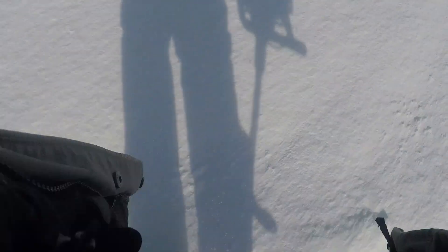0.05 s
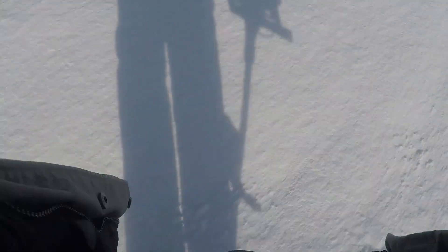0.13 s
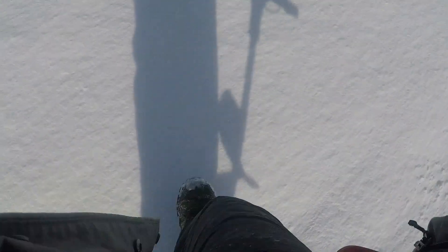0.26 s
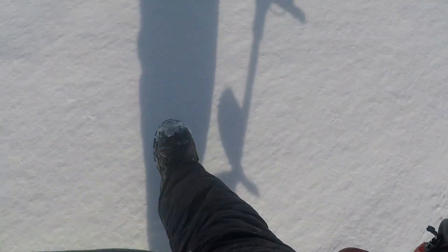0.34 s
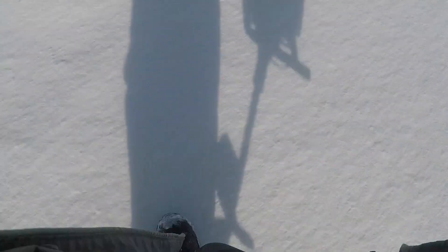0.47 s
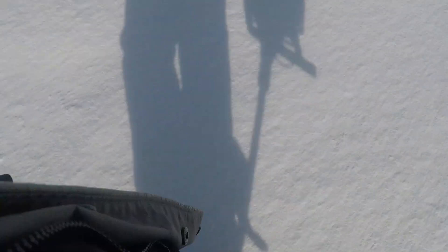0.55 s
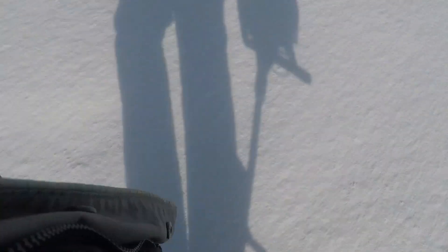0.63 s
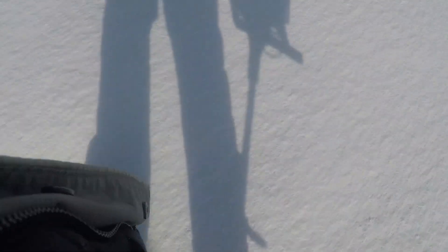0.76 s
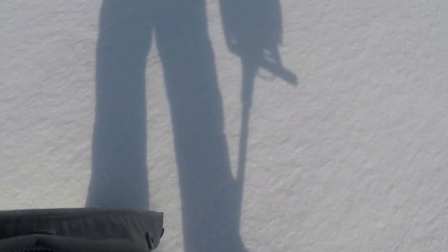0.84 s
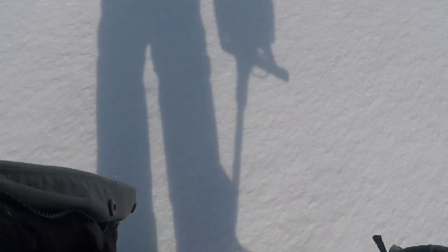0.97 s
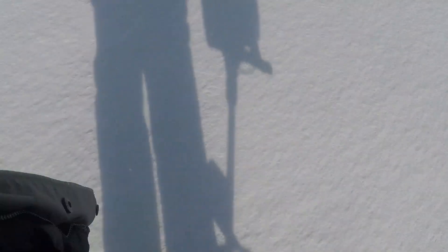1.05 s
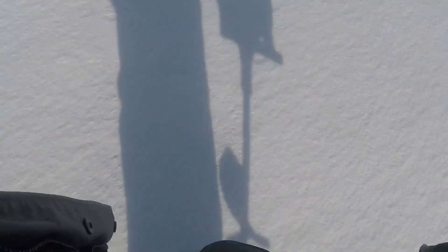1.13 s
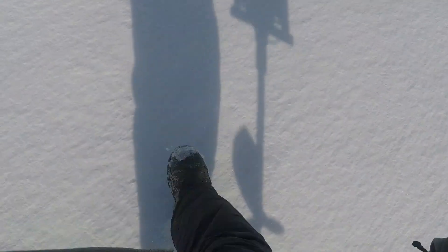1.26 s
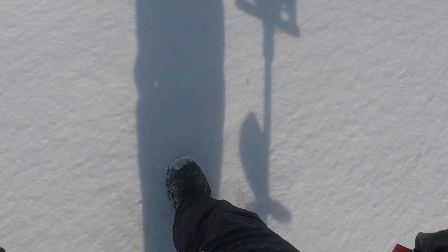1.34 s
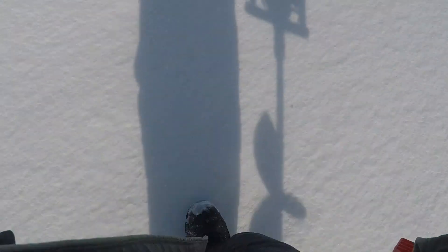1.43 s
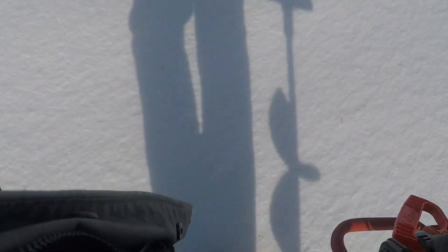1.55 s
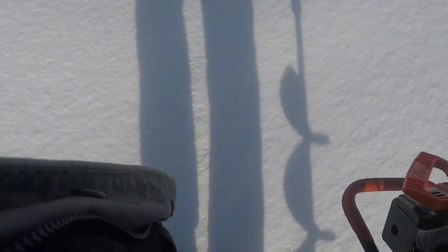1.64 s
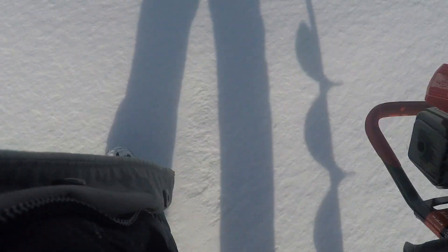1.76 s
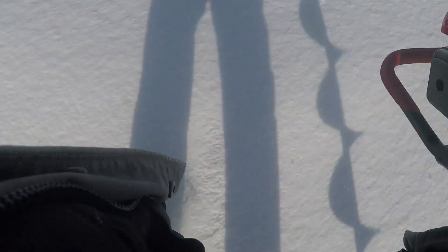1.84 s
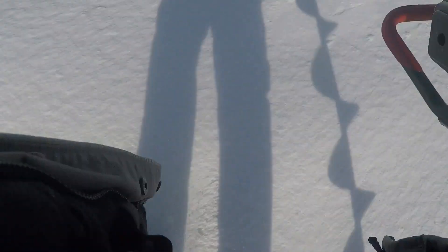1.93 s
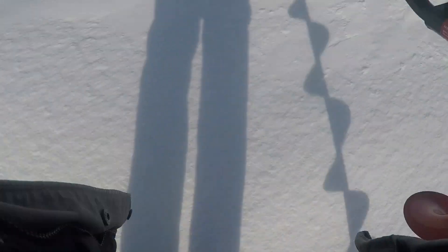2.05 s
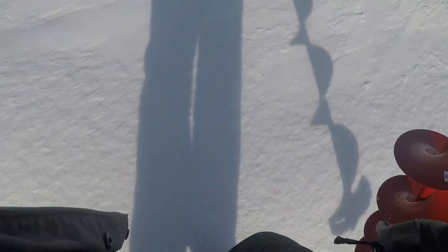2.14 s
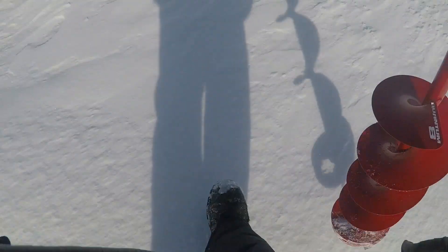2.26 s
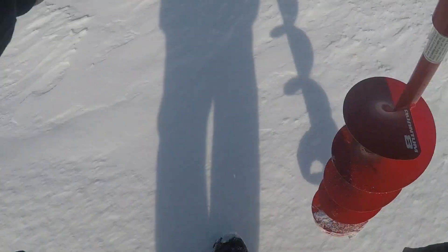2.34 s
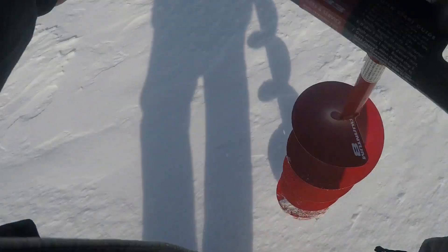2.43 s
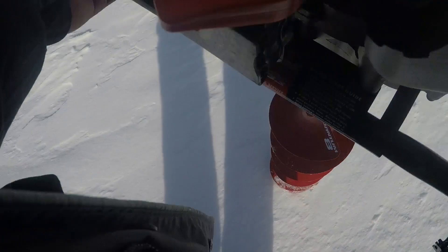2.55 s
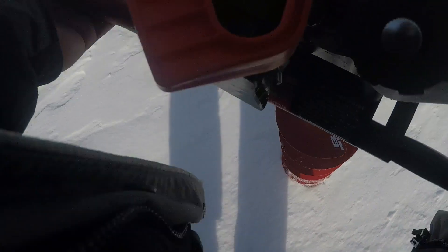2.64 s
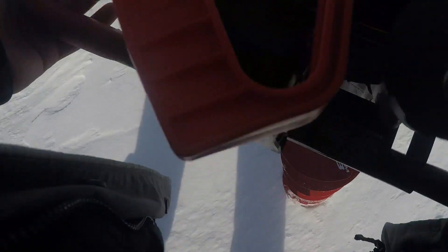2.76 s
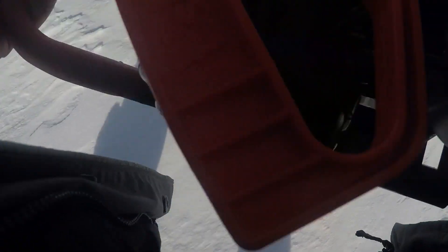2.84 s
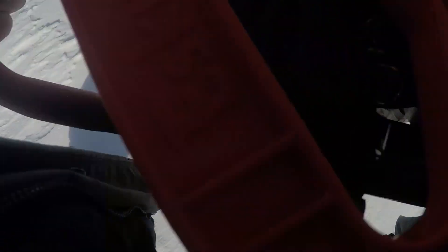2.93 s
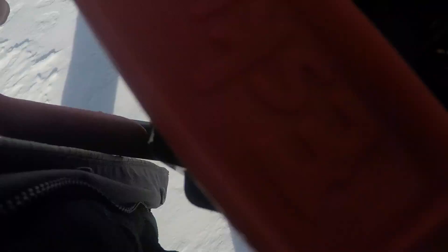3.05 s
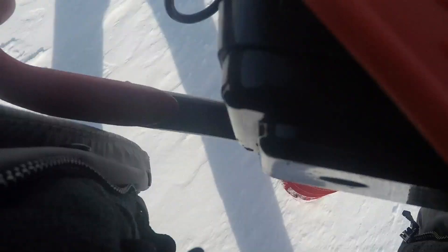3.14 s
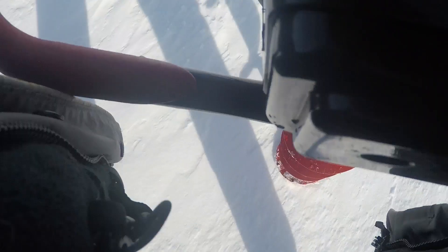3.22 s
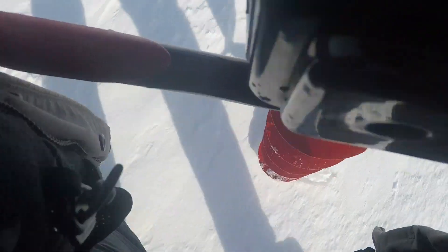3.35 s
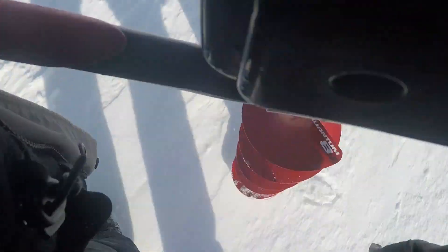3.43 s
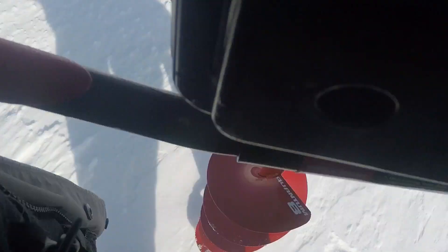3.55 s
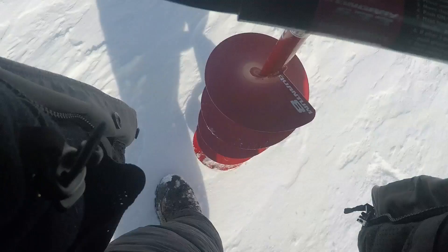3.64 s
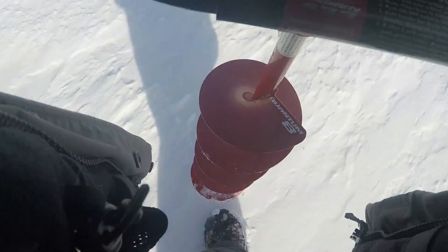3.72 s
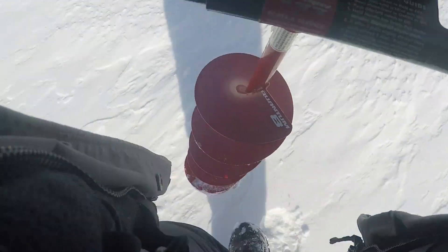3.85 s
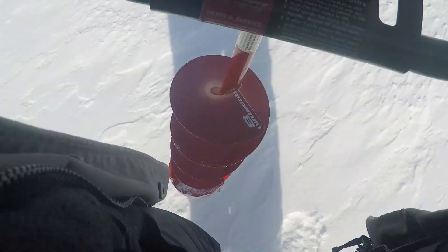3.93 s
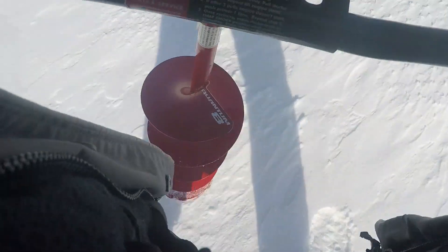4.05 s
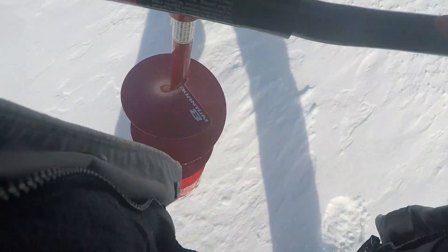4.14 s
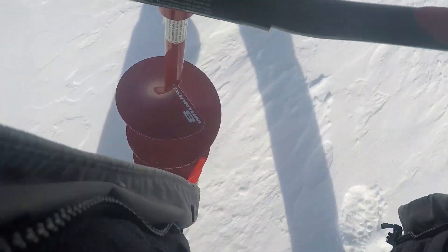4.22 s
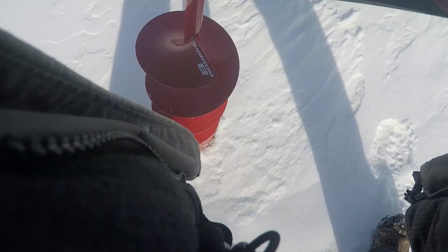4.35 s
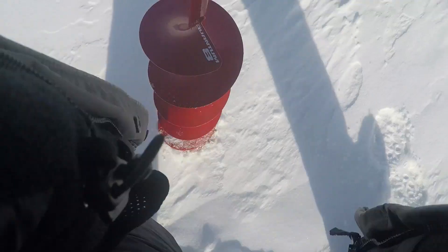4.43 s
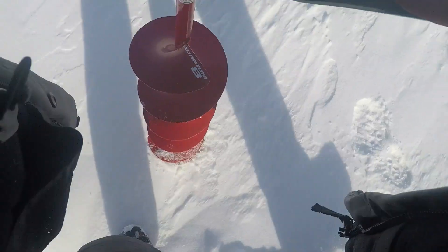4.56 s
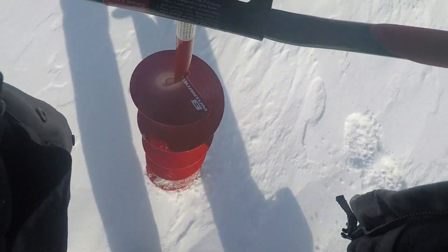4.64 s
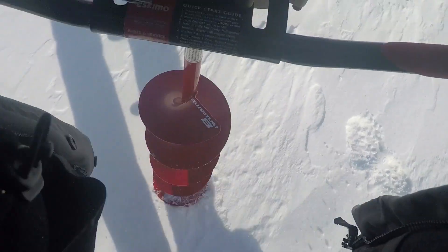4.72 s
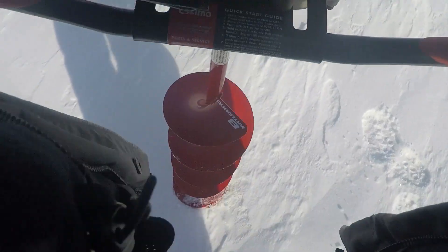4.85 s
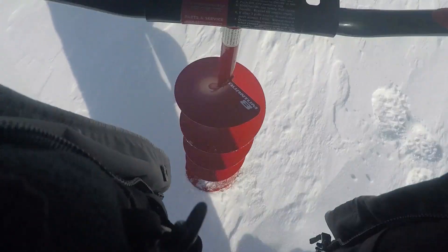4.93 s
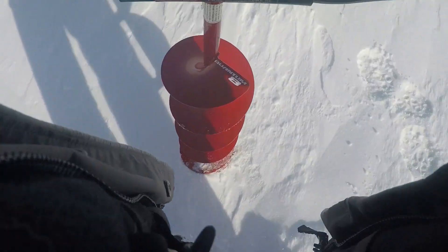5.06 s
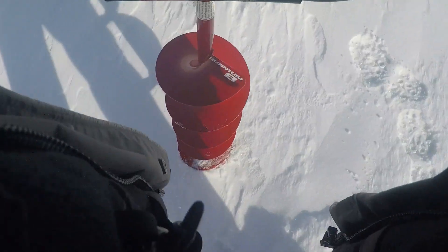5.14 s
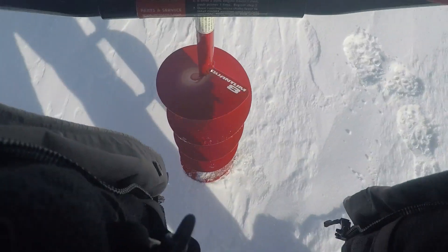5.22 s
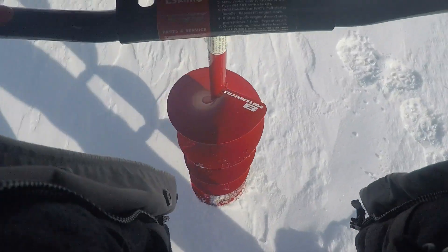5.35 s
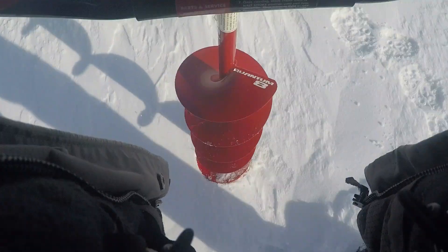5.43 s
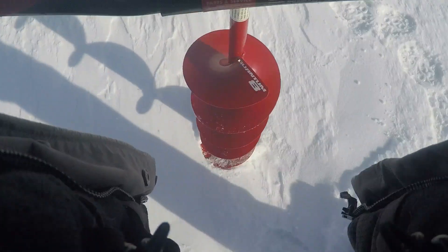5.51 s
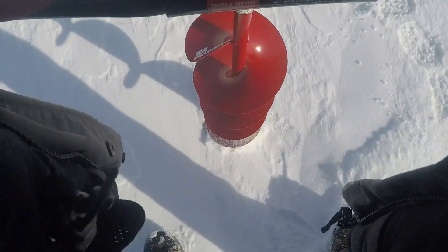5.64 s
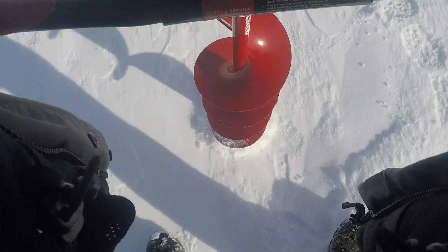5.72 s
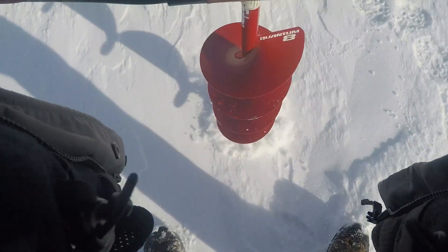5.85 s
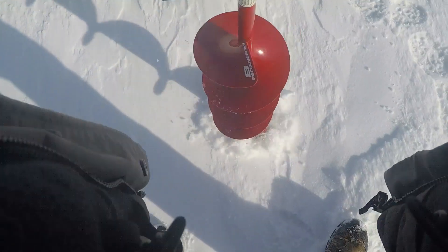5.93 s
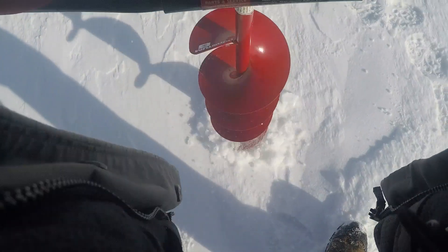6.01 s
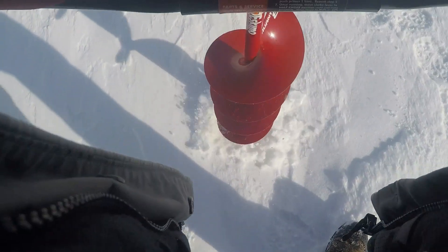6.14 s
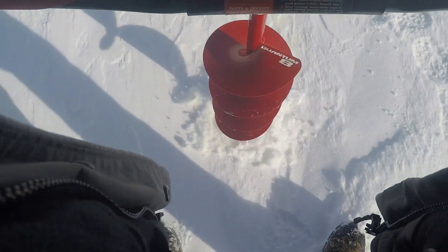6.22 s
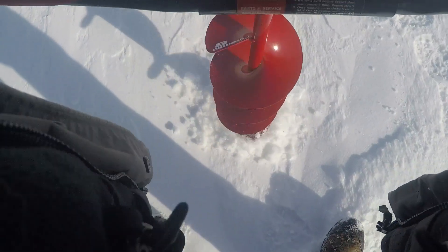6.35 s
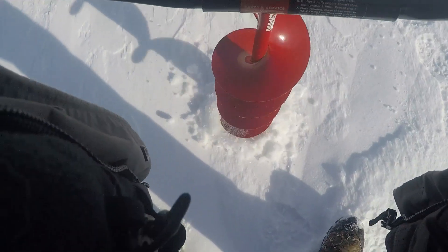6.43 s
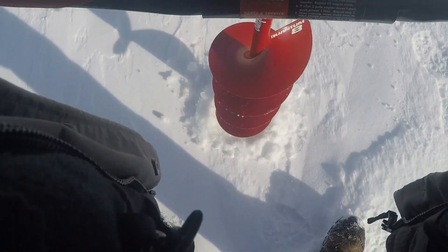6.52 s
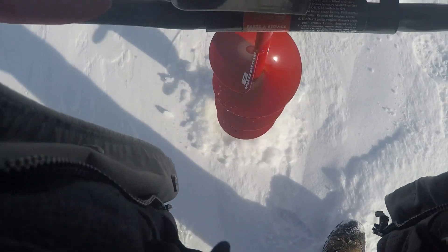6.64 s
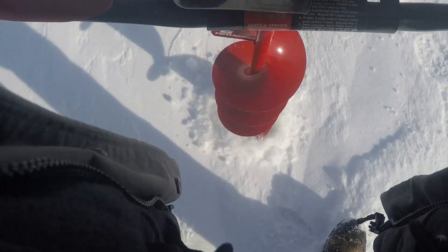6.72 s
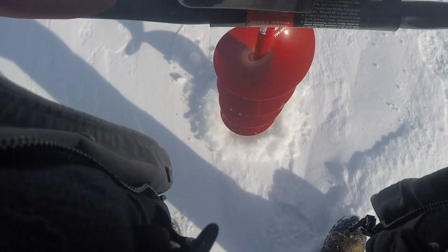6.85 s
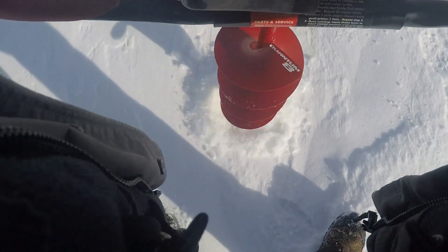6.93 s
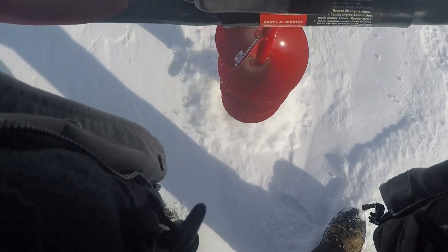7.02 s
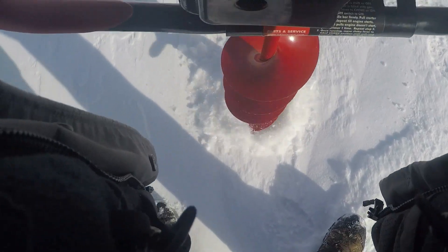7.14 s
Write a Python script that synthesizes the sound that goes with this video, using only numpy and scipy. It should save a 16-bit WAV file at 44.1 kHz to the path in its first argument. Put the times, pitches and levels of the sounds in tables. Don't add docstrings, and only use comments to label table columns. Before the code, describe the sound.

Rough two-stroke putter over windy footsteps grows near, two harsh knocks with a buzz muffle it, then the throttle opens into a screaming drone.

```python
import sys
import numpy as np
from scipy import signal
from scipy.io import wavfile
from scipy.ndimage import uniform_filter1d

SR = 44100
rng = np.random.default_rng(int(sys.argv[2]) if len(sys.argv) > 2 else 0)


def volts(x):
    e = np.asarray(x, float) / 20
    return 10 ** e


def generate_wav(sig):
    pcm = np.round(np.clip(np.atleast_2d(sig).T, -1, 1) * 32767).astype(np.int16)
    wavfile.write(sys.argv[1], SR, pcm)


N = 316638
TIME = np.arange(N) / SR
FREE_HZ = 139.9

# (time [s], share [0-1])
UNEVEN_FIRING = [(0, 0.11), (5.3, 0.09), (5.5, 0), (6.06, 0), (6.11, 0.41), (7.18, 0.41)]
# (time [s], share [0-1])
CLOSENESS = [(0, 0), (1.85, 0.08), (2.15, 0.72), (7.18, 1)]


def evened(x):
    return x / np.sqrt(np.mean(x ** 2) + 1e-20)


def levelled(x):
    power = uniform_filter1d(uniform_filter1d(x ** 2, size=6000), size=6000)
    return x / np.sqrt(power + 1e-12)


def columns(rows):
    s, *rest = np.transpose(rows)
    return [np.interp(TIME, s, c) for c in rest]


def colour(x, points):
    f, db = np.transpose(points)
    hz = abs(np.fft.fftfreq(8192, 1 / SR))
    gain_db = np.interp(np.log(hz + 1), np.log(f), db, -90, -90)
    log_gain = np.log(volts(np.maximum(gain_db, -90)))
    taps = np.fft.ifft(np.exp(log_gain - 1j * signal.hilbert(log_gain).imag)).real[:4096]
    return evened(signal.oaconvolve(x, taps)[:N])


def ring(x, hz, width):
    return signal.lfilter(*signal.iirpeak(hz, hz / width, SR), x)


def wander(per_s):
    return evened(signal.lfilter(*signal.butter(2, per_s, fs=SR), rng.standard_normal(N)))


def ticks(turns, delay):
    return np.diff(np.floor(turns - delay), prepend=0).clip(0, 1)


def orders(turns, table, flutter_db):
    total = 0
    for k, db in table:
        gain = volts(db + flutter_db * wander(4.6))
        total = total + gain * np.cos(2 * np.pi * (k * turns + rng.random()))
    return total


def lift():
    start_s, length_s = 1.5, 1.22
    return np.sin(np.pi / 2 * np.clip((TIME - start_s) / length_s, 0, 1)) ** 2


def hiss():
    return volts(-84) * rng.standard_normal(N)


def wind(throttle):
    # (time [s], sway level [dB], thud level [dB])
    lumps = [(.03, -19, -53), (.13, -25, -29), (.24, -30, -50), (.5, -18.5, -33), (.85, -28.5, -31),
             (.95, -23.5, -52), (1.22, -28, -22.5), (1.42, -25, -40), (1.58, -25, -27), (1.77, -28, -30),
             (1.92, -23, -23), (2.05, -31, -34), (2.3, -30, -30), (2.48, -27, -36), (2.64, -22, -36),
             (2.96, -32, -27), (3.17, -23, -32), (3.34, -28.5, -30), (3.77, -14, -36), (4.4, -24, -45),
             (4.52, -19.5, -36), (4.74, -29, -29), (5.12, -31, -21.5), (5.31, -29, -45), (5.49, -23.5, -29),
             (5.81, -21.5, -42), (6.14, -27, -42), (6.51, -31, -45), (6.82, -30, -44), (7.15, -30, -42)]
    sway_s, thud_s = 0.058, 0.021
    calm_sway_db, calm_thud_db, close_thud_db, drilling_db = -33, -60, 14, -11
    sway_power = volts(2 * (calm_sway_db + drilling_db * throttle))
    thud_power = volts(2 * (calm_thud_db + close_thud_db * lift() + drilling_db * throttle))
    for s, sway_db, thud_db in lumps:
        sway_power = sway_power + volts(2 * sway_db) * np.exp(-((TIME - s) / sway_s) ** 2)
        thud_power = thud_power + volts(2 * thud_db) * np.exp(-((TIME - s) / thud_s) ** 2)
    sway = colour(rng.standard_normal(N), [(8, -20.5), (18, 10), (40, -7), (55, -18.0), (70, -8)])
    thud = colour(rng.standard_normal(N), [(40, -60), (55, 5.5), (100, -9.5), (150, -11), (220, -10)])
    return np.sqrt(sway_power) * levelled(sway) + volts(-6.0) * np.sqrt(thud_power) * levelled(thud)


def knocks():
    # (time [s], peak level [dB], length [s], centre [Hz], width [Hz])
    cracks = [(3.4372, 4.5, 0.0075, 2100, 2440), (3.4505, 3, 0.0041, 1770, 1830),
              (3.639, -12, 0.0049, 2580, 580), (3.627, -24, 0.0038, 3000, 880),
              (3.6765, -9.5, 0.0039, 2100, 1600), (2.021, -26, 0.0061, 1400, 2200),
              (2.673, -22.5, 0.0065, 1400, 1700), (4.384, -23, 0.015, 2150, 2600),
              (5.478, -14.5, 0.021, 3070, 6900), (5.53, -24, 0.06, 8000, 560), (.455, -45, .02, 5000, 4900),
              (.815, -42, .02, 3400, 5330), (4.392, -31, 0.04, 670, 2900), (3.7, -42.5, 0.19, 170, 170),
              (4.39, -31, .04, 1700, 900)]
    # (time [s], peak level [dB], start pitch [Hz], droop [1/s], decay [s])
    pushes = [
        (3.441, 7, -100, 5, 0.0039),
        (3.4534, -2, 139, 4.5, 0.0061),
        (3.643, 2, 66, 27, 0.012),
        (3.679, -8, 147, 1.6, 0.0078),
    ]
    out, t = np.zeros(N), np.arange(12000) / SR
    for s, db, length, hz, width in cracks:
        noise = rng.standard_normal(len(t)) * np.exp(-(t / length) ** 2) * np.minimum(t / 0.0012, 1)
        body = ring(ring(noise, hz, width), hz, width)
        edge = ring(ring(noise, 4600, 3000), 5000, 3500)
        crack = body + 0.014 * edge
        out[round(s * SR):][:len(t)] += volts(db) * crack / abs(crack).max()
    for s, db, hz, droop, decay in pushes:
        push = np.sin(2 * np.pi * hz * t / (1 + droop * t)) * np.exp(-t / decay)
        out[round(s * SR):][:len(t)] += volts(db) * push
    return out


def touch():
    # (time [s], shake level [dB], buzz level [dB])
    contact = [
        (3.458, -16, -20),
        (3.478, -18, -34),
        (3.484, -18, -25.5),
        (3.606, -20, -26.5),
        (3.644, -14, -23.5),
    ]
    # (multiple of the shaft speed, level [dB])
    shake_orders = [(1, 1.5), (2, 4.5), (3, -16), (4, -2.5), (5, -25), (6, -17), (7, -23), (8, -27)]
    # (frequency [Hz], density [dB per Hz])
    case_colour = [(410, -50), (700, -22), (1010, -25), (1200, -4), (1380, 0.5), (2240, -13.5),
                   (2530, -2.5), (2880, -26), (3210, -1.5), (3880, -34), (4530, -12.5), (5540, -30),
                   (6090, -33), (7280, -55), (12000, -66), (15600, -88), (22000, -120)]
    turns = (TIME - 3.4665) * 56.6
    shake_db, buzz_db = columns(contact)
    held = np.clip(np.minimum(TIME - contact[0][0], contact[-1][0] - TIME) / 0.0019, 0, 1)
    shake = 0
    for k, db in shake_orders:
        shake = shake + volts(db + 3.3 * wander(38)) * np.sin(2 * np.pi * k * turns + 0.69 * k)
    from_blow = (turns % 1 - .1 + .5) % 1 - .5
    rattle = (.45 + .8 * np.exp(-from_blow ** 2 / 0.015)) * rng.standard_normal(N)
    buzz = colour(rattle, case_colour)
    return held * (volts(shake_db) * evened(shake) + volts(buzz_db) * buzz)


def whine(speed):
    # (multiple of the shaft speed, level [dB])
    blades_and_teeth = [(13, -9.5), (14, -10), (16, -14), (18, 2), (18.5, -9), (19, -22), (19.5, -10.5),
                        (20, 0.5), (22, -7.5)]
    mesh_hz, mesh_span_hz = 113, 9
    turns = np.cumsum(speed * (1 + 0.002 * wander(27.0))) / SR
    onset = np.clip((speed - mesh_hz) / mesh_span_hz, 0, 1)
    fan = [r for r in blades_and_teeth if r[0] < 18.7]
    gear = [r for r in blades_and_teeth if r[0] > 18.7]
    fan_db = -22 + .55 * (speed - FREE_HZ)
    tones = volts(fan_db) * orders(turns, fan, 1.3) + volts(-21.5) * orders(turns, gear, 0.77)
    return np.sqrt(2) * onset * tones


def burst(turns, strength, depth, first, second):
    swell = first * np.exp(-(turns % 1) / .11) + second * np.exp(-((turns - .22) % 1) / .12)
    swell = uniform_filter1d(strength * swell, size=90)
    return (1 - depth + 3 * depth * swell) * volts(.5 * wander(25)) * rng.standard_normal(N)


def leak(turns, strength, throttle):
    return levelled(burst(turns - .08, strength, .5 - 0.21 * throttle, 0.3, 0.64))


def vent(gas):
    hz, width_hz = 5750, 600
    sweep = np.exp(-((TIME - 1.97) / .2) ** 2)
    return volts(-50) * sweep * evened(ring(ring(gas, hz, width_hz), hz, width_hz))


def fizz(gas):
    # (frequency [Hz], density [dB per Hz])
    usual_side = [(2470, -26), (4200, -0.5), (4530, -5.5), (6710, -4.5), (7320, -9), (7610, -13),
                  (8210, -13.5), (9410, -20.5), (10800, -20.5), (11900, -18.5), (14600, -31.5),
                  (15500, -33)]
    # (frequency [Hz], density [dB per Hz])
    other_side = [(2470, -25), (4200, 1), (4710, -8.5), (5490, -5), (6500, 1), (7570, -20), (8210, -19),
                  (10600, -25), (11800, -17), (14700, -30), (15500, -34)]
    turned = columns([(4.5, 0.11), (4.62, 1), (5.4, 1), (5.5, 0.022)])[0]
    return (1 - turned) * colour(gas, usual_side) + turned * colour(gas, other_side)


def piston_knock(turns, strength):
    t = np.arange(0, .005, 1 / SR)
    wavelet = np.hanning(len(t)) * np.sin(2 * np.pi * 2880 * t)
    return volts(-7) * evened(signal.oaconvolve(ticks(turns, .14) * strength, wavelet)[:N])


def clatter(turns, throttle, strength):
    # (frequency [Hz], density [dB per Hz])
    low_shell = [(620, -32), (800, -19), (900, -26), (1050, -18), (1140, -30), (1310, -13.5), (1530, -20.5),
                 (1690, -14), (1960, -19.5), (2370, -3.5), (2480, 0), (2740, -11), (3080, -10),
                 (3510, -24.5), (3870, -10), (4800, -19), (6240, -26.5), (10600, -120)]
    # (frequency [Hz], density [dB per Hz])
    near_shell = [(680, -44), (1150, -21.5), (1280, -26), (1580, -18.5), (1730, -14), (1900, -13),
                  (2040, -6.5), (2360, -9.5), (2870, 3.5), (3030, -1), (3370, -12), (3870, -5),
                  (4180, -12.5), (4800, -20), (6240, -70), (10600, -120)]
    # (frequency [Hz], density [dB per Hz])
    open_shell = [(470, -55), (800, -19), (889, -37), (979, -20), (1170, -25), (1550, -11), (1740, -3.5),
                  (2060, -3), (2230, -5), (2520, 0.5), (3020, 2.5), (3300, -9.5), (3890, -1.5), (4320, -37),
                  (4800, -22), (6240, -59), (10600, -120)]
    # (frequency [Hz], width [Hz], level [dB])
    loose_tin = [(2970, 26, -13), (5497, 60, -22.5), (6150, 83, -38), (2074, 33, -22.5), (2454, 19, -19),
                 (3980, 37, -18.5)]
    slaps = (ticks(turns, .02) - ticks(turns, .24)) * strength * np.sqrt(SR / 120)
    near = columns(CLOSENESS)[0]
    depth = .36 + .16 * near - .29 * throttle
    slap_gain = volts(-12 + 3 * near - 4 * throttle)
    blows = levelled(burst(turns, strength, depth, .75, 1.15) + slap_gain * slaps)
    idle = (1 - near) * colour(blows, low_shell) + near * colour(blows, near_shell)
    for hz, width, db in loose_tin:
        idle += volts(db + 2.2 * wander(4)) * evened(ring(blows, hz, width))
    idle += near * piston_knock(turns, strength)
    driven = volts(-1) * colour(blows, open_shell)
    return levelled((1 - throttle) * idle + throttle * driven) * volts(-3 * throttle)


def muffler(turns):
    hz, width_hz = 240, 110
    chance = rng.standard_normal((int(turns[-1]) + 1, 2))[turns.astype(int)]
    delay = .955 + .025 * np.clip(chance[:, 0], -3, 1.5)
    back = ticks(turns, delay) * volts(2.5 * chance[:, 1])
    return volts(-3) * evened(ring(ring(back, hz, width_hz), hz, 2 * width_hz))


def idle_exhaust(turns, strength):
    # (frequency [Hz], level [dB])
    pipe = [(30, -44), (55, -8), (110, -5), (170, -5), (225, 2.5), (270, 0.5), (335, -6), (390, -12),
            (445, -2), (560, -12.5), (700, -17.5), (830, -15), (950, -22), (1150, -28.5), (1400, -36),
            (2500, -53)]
    puffs = (ticks(turns, .52) + .15 * ticks(turns, .87)) * np.sqrt(strength)
    idle = colour(puffs + .006 * rng.standard_normal(N), pipe)
    idle += muffler(turns)
    idle -= .5 * (1 - columns(CLOSENESS)[0]) * ring(idle, 110, 130)
    port = [(300, -36), (550, -3.0), (800, 1), (1100, -6), (1400, -37)]
    idle += volts(-10.5) * colour(ticks(turns, .5) * strength ** 2, port)
    return idle


def open_exhaust(turns, speed):
    # (multiple of the shaft speed, level as the clutch bites [dB], climbing [dB], at full speed [dB])
    pull_orders = [(1, -8.5, 0, -5.5), (2, -20.5, -10.5, -10.5), (3, -12.5, -15.5, -22.5),
                   (4, -17.5, -20, -31), (5, -16.5, -19.5, -15.5), (6, -24, -16.5, -24),
                   (7, -27, -21, -30.5), (8, -31, -26, -35), (9, -19, -27, -31), (10, -32, -35, -22),
                   (11, -32, -29, -34), (12, -29, -17.5, -41)]
    pull_speeds = [85, 119.4, 139.2]
    # (multiple of the shaft speed, level [dB])
    half_orders = [(.5, -25), (1.5, -18.5), (2.5, -19.5), (3.5, -23), (4.5, -28), (5.5, -35), (6.5, -29),
                   (7.5, -29)]
    wholes = [(k, np.interp(speed, pull_speeds, db)) for k, *db in pull_orders]
    pull = orders(turns, wholes, 1.56)
    pull = pull + 2.58 * columns(UNEVEN_FIRING)[0] * orders(turns, half_orders, 1.3)
    roar = colour(rng.standard_normal(N), [(60, -11), (300, -12), (900, -14), (1400, -37)])
    return volts(12.5) * pull + volts(-15) * roar


def exhaust(turns, speed, strength):
    up = np.clip((speed - 60) / 22, 0, 1)
    return (1 - up) * volts(-2.0) * idle_exhaust(turns, strength) + up * open_exhaust(turns, speed)


def levels(speed, throttle):
    # (held low [dB], held close [dB], open throttle [dB], more under load [dB], bark as it opens [dB])
    layers = [
        (-39.5, -30.5, -33, 5, 8),
        (-42.5, -25.5, -17, 6.5, -1),
        (-62, -39.5, -27.5, 1.5, 1.5),
    ]
    up = lift()
    load = np.clip((FREE_HZ - speed) / 15.2, 0, 1)
    bark = np.exp(-((TIME - 5.45) / 0.047) ** 2)
    out = []
    for low_db, near_db, open_db, load_db, bark_db in layers:
        idle_db = low_db + up * (near_db - low_db)
        out.append((1 - throttle) * idle_db + throttle * (open_db + load_db * load) + bark_db * bark)
    spray_db = 3 * np.maximum(TIME - 6.25, 0)
    stride_db = 3.5 * (1 - up) * np.cos(2 * np.pi * (TIME - 0.806) / .47)
    return out[0], out[1], out[2] + spray_db + stride_db


def scene():
    # (time [s], speed [Hz])
    shaft_speed = [(0, 56.83), (0.44, 55.94), (1.7, 57.38), (1.9, 55.77), (3.16, 55.07), (3.74, 57.03),
                   (4.44, 54.72), (5.37, 55.29), (5.5, 85.1), (5.58, 90.3), (5.76, 118.2), (6.0, 135.5),
                   (6.19, 140), (6.386, 136.4), (6.518, 137.7), (6.782, 133.9), (6.97, 135.2),
                   (7.18, 132.6)]
    # (time [s], level [dB])
    duck = [
        (3.42, 0.5),
        (3.425, -16.5),
        (3.66, -30),
        (3.72, -21.5),
        (3.8, -21),
        (3.97, -16),
        (5.15, -2),
        (5.4, -2),
    ]
    speed = columns(shaft_speed)[0]
    throttle = np.clip((speed - 58) / 25, 0, 1)
    hunting = .5 * (1 - throttle) * wander(6)
    turns = np.cumsum(speed * (1 + 0.00467 * wander(23.97)) + hunting) / SR + 0.307
    count = np.floor(turns).astype(int)
    strength = volts(.7 * rng.standard_normal(count[-1] + 1))[count]
    strength = strength * (1 + columns(UNEVEN_FIRING)[0] * (-1) ** count)

    pipe_db, clatter_db, fizz_db = levels(speed, throttle)
    gas = leak(turns, strength, throttle)
    airborne = wind(throttle) + vent(gas) + volts(fizz_db) * fizz(gas)
    airborne += volts(clatter_db) * clatter(turns, throttle, strength)
    airborne += volts(pipe_db) * exhaust(turns, speed, strength)
    mix = hiss() + knocks() + touch() + whine(speed) + volts(columns(duck)[0]) * airborne
    return mix[None]


def roll_off(x):
    return signal.sosfilt(signal.butter(12, 15610, fs=SR, output="sos"), x)


def record(dry):
    clipped = np.clip(dry, -.99, .99)
    return roll_off(clipped)


dry = scene()
out = record(dry)
generate_wav(out)
```